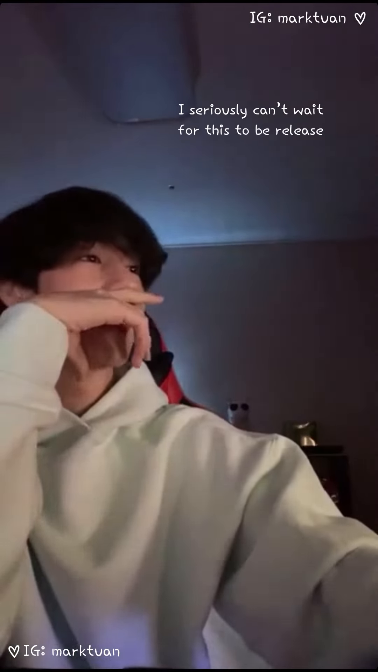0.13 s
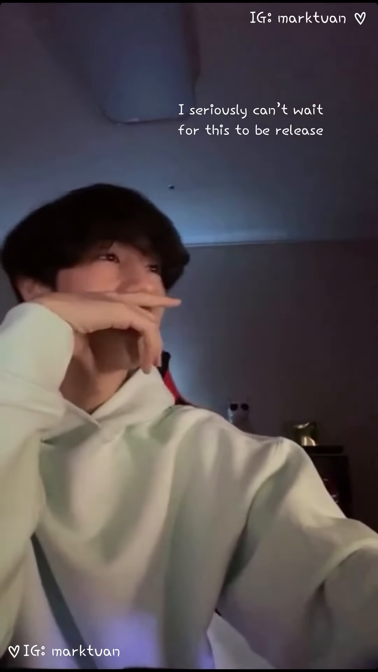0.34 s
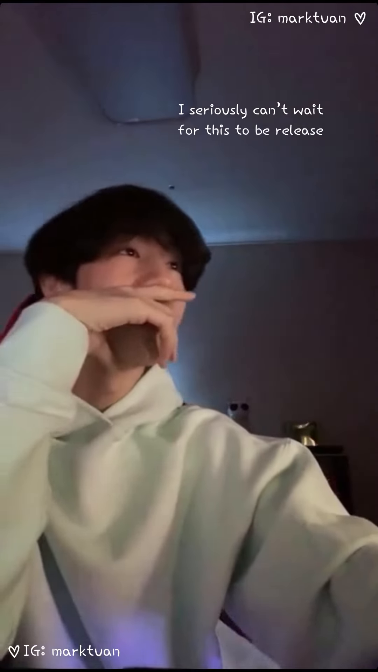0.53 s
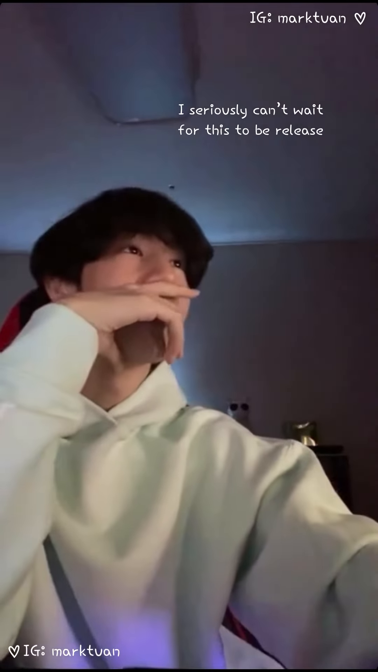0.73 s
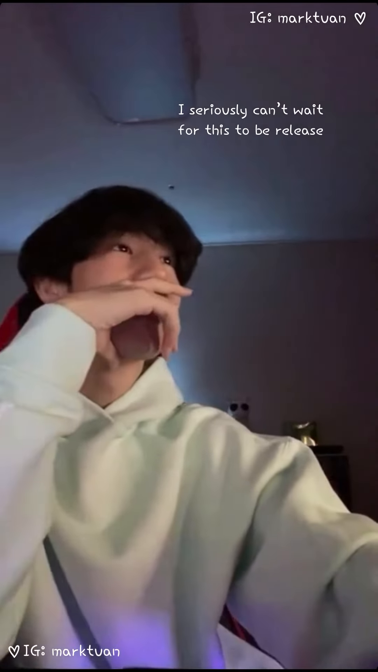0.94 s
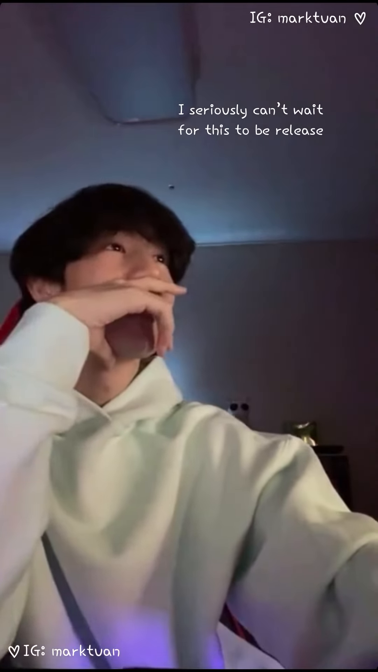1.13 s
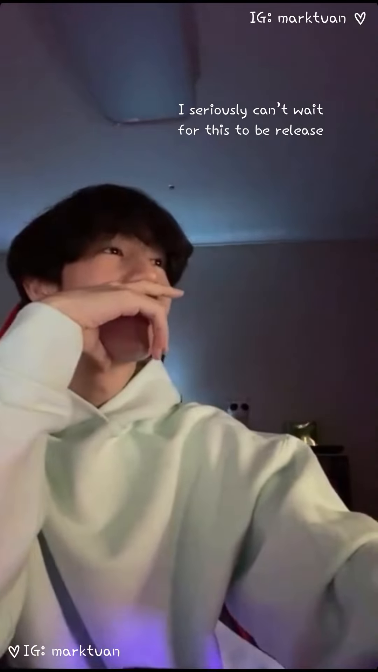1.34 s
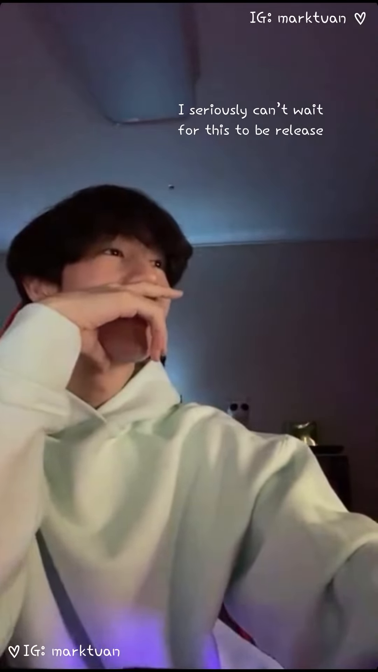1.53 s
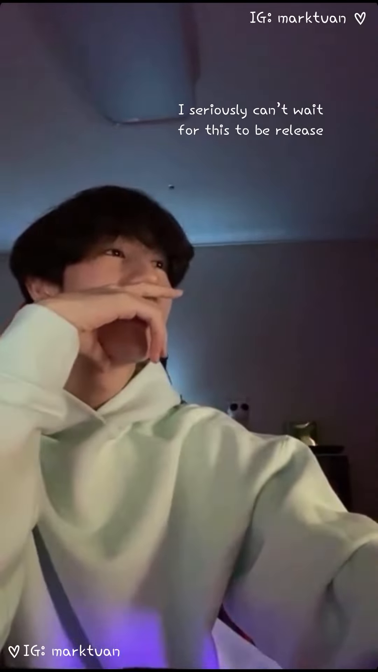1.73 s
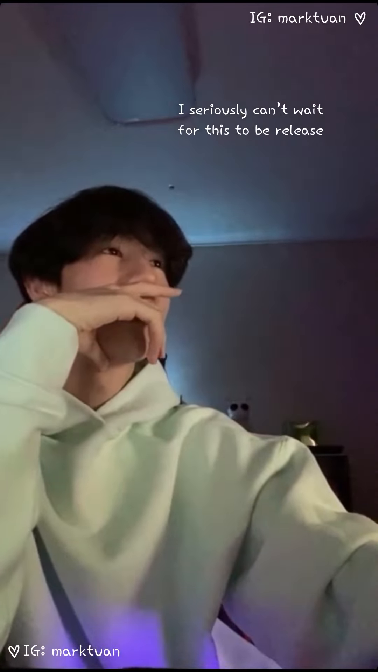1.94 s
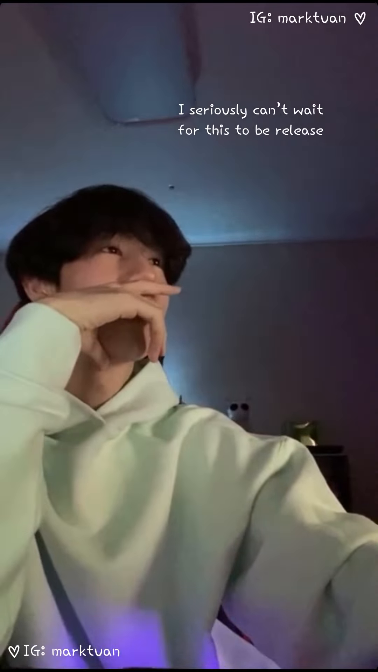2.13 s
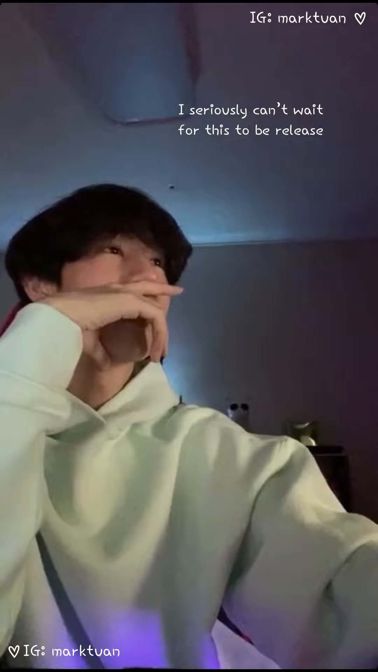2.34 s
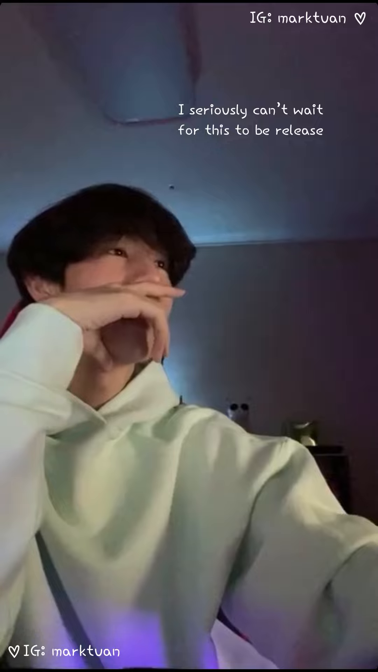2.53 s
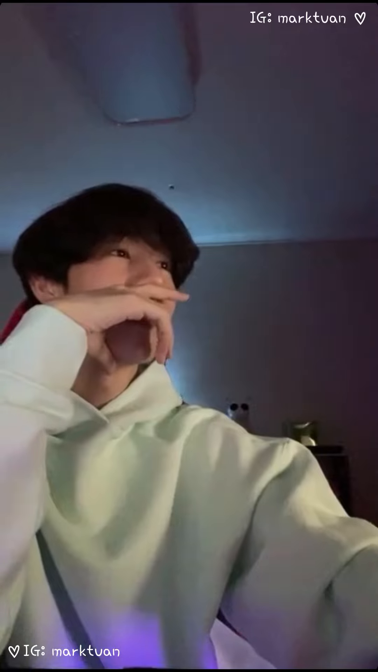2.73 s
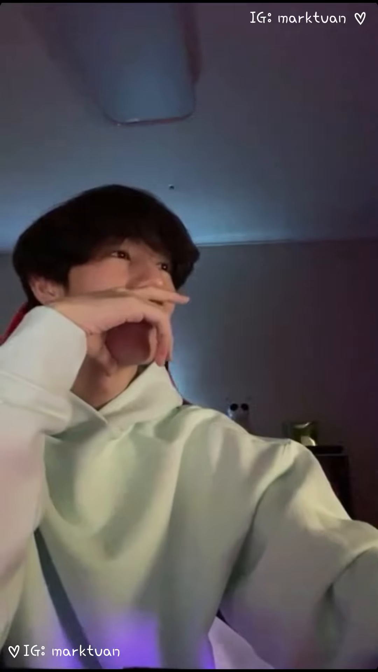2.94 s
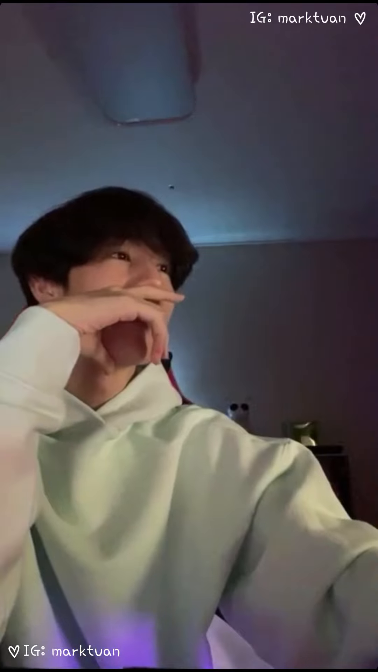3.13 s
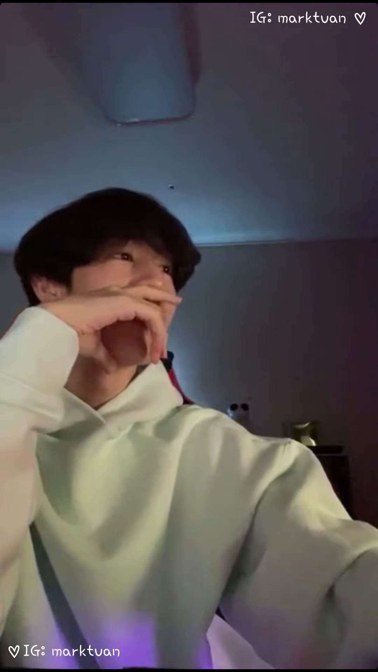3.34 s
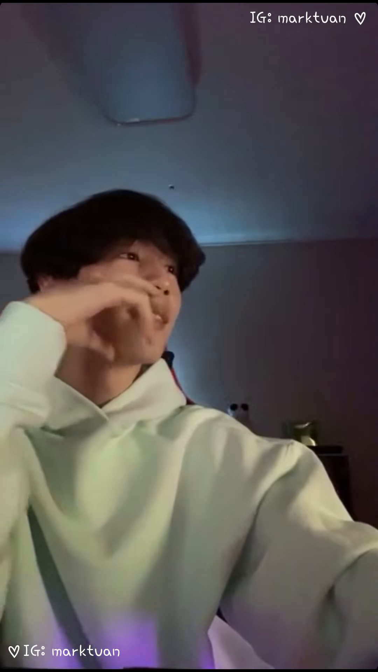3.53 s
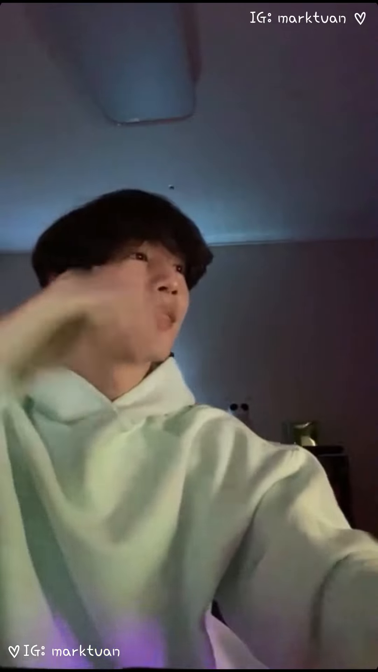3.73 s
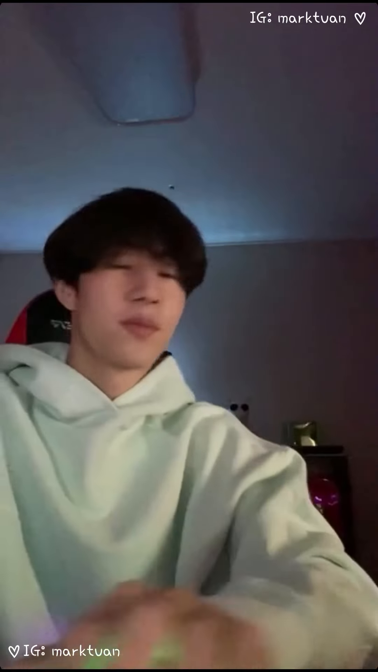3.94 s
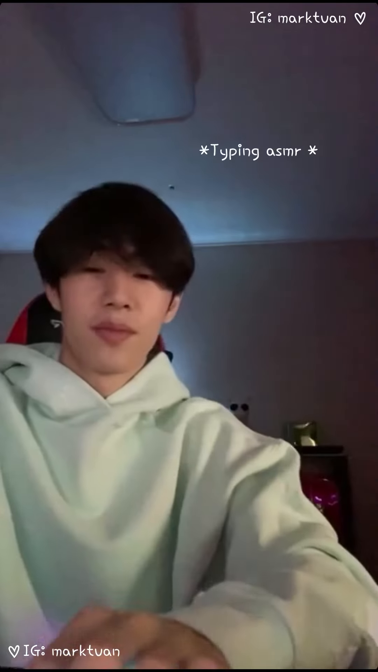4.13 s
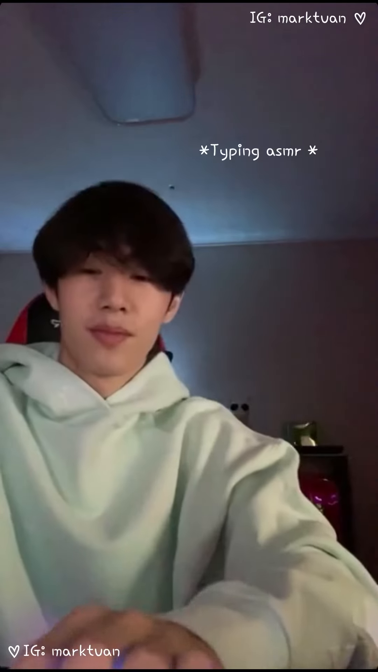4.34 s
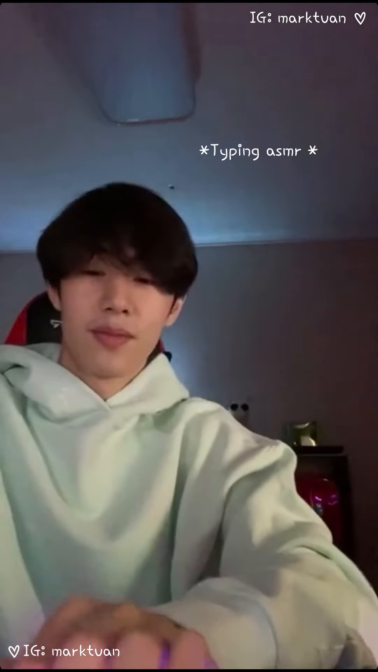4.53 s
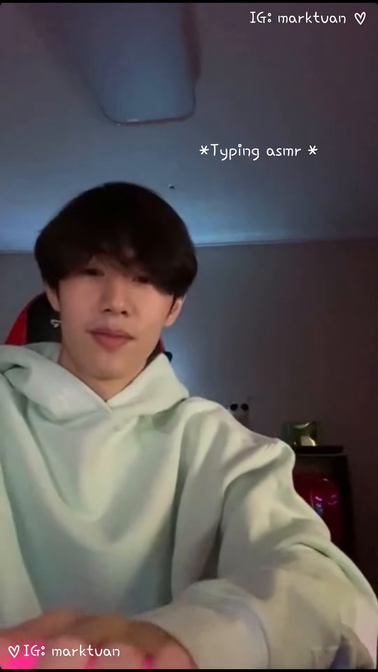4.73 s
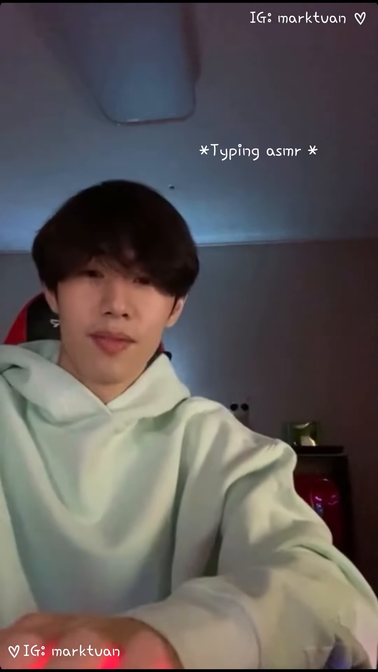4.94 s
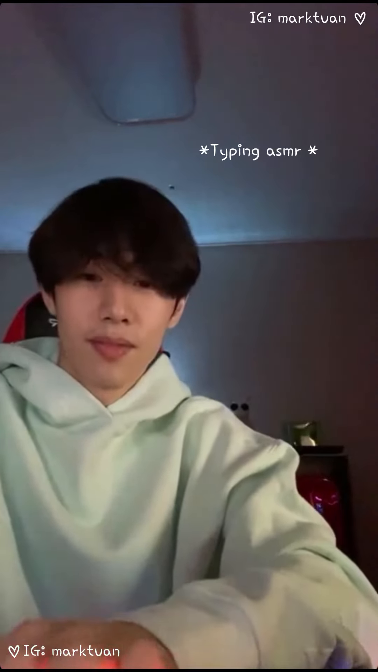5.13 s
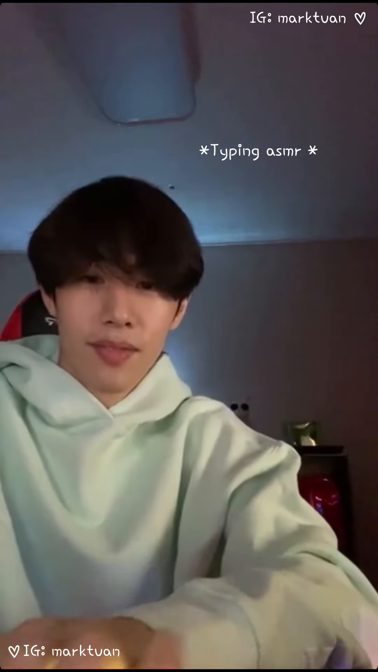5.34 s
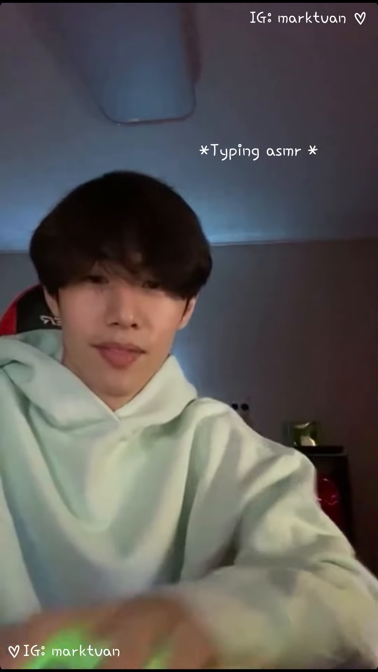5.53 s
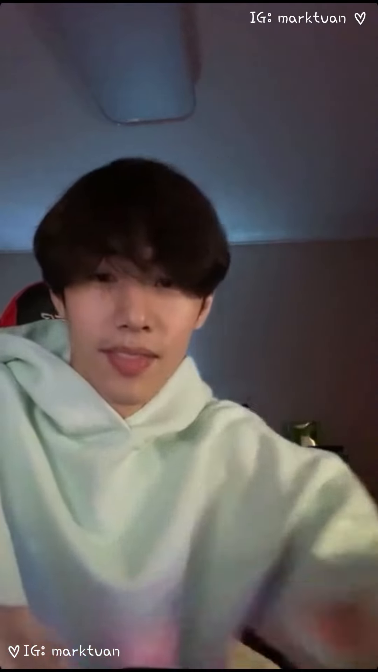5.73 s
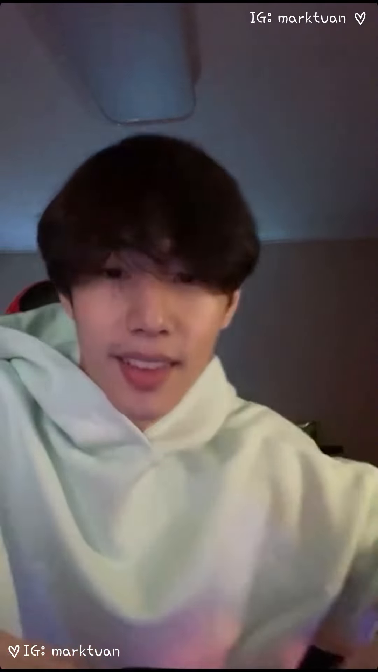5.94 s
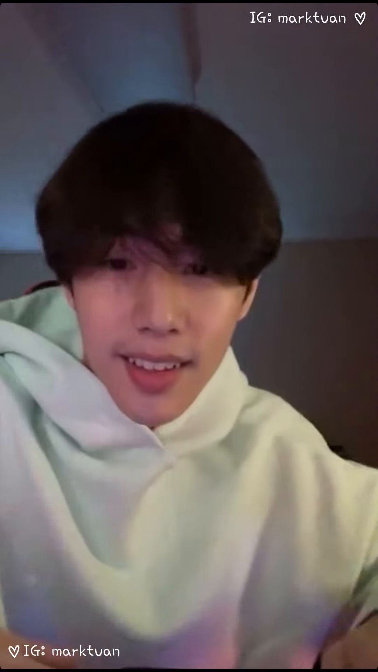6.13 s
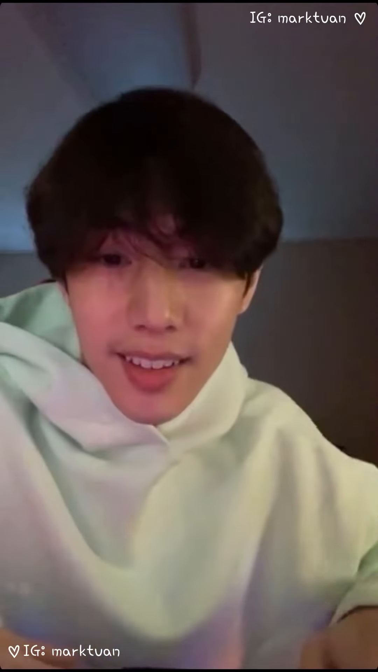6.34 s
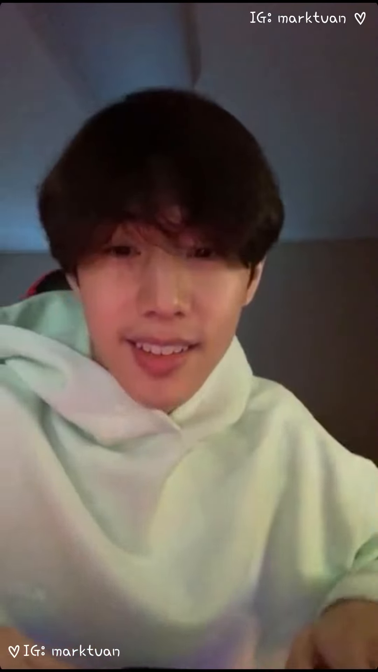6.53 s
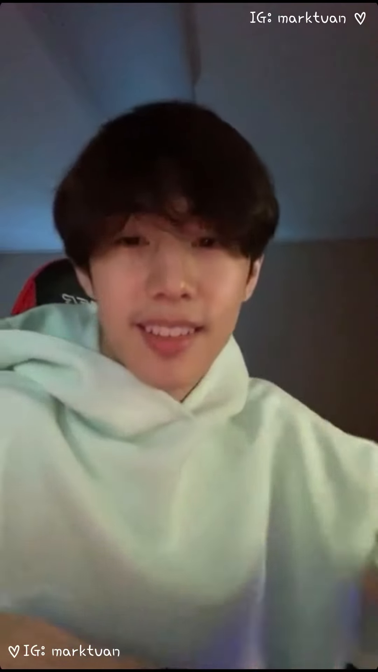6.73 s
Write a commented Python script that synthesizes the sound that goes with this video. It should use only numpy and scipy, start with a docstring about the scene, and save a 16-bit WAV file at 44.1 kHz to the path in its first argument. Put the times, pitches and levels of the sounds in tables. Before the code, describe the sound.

In a quiet small room, a computer fan hums low and faint. A mouse button clicks crisply at about one second and again at three. Clothing rustles, then a hand drops onto a plastic mechanical keyboard and types a fast, uneven burst for about a second, with clacks and dull desk thumps. Sleeve rubbing and a soft arm bump follow. Close microphone, slightly dull on top, short room tail.

```python
"""Mouse clicks and fast typing at a desk

A quiet room, heard from close by: mouse clicks, then a fast burst on a plastic mechanical keyboard.
Clicks and keys are damped modes struck by short noise contacts, each with a diffuse room tail.
Sleeves and mouse rub the desk as shaped noise, with a thin whistle on one sweep; arms bump the desk as
low decaying sines. A computer fan hums as low noise plus wavering tones.
"""
import sys
import numpy as np
from scipy import signal
from scipy.fft import rfft, irfft, next_fast_len
from scipy.io import wavfile
from scipy.ndimage import uniform_filter1d, map_coordinates

SR = 44100
rng = np.random.default_rng(int(sys.argv[2]) if len(sys.argv) > 2 else 0)


def to_wav(sig):
    """Store sig (one row per channel, or 1-D mono) as 16-bit WAV at the path in sys.argv[1].

    Samples outside -1..1 are clipped; the rate is SR.
    """
    pcm = np.clip(np.atleast_2d(sig), -1, 1) * 32767
    pcm = np.round(pcm).astype(np.int16)
    wavfile.write(sys.argv[1], SR, pcm.T)  # frames by channels


N = 298998
TIME = np.arange(N) / SR
LEAD = SR // 80  # samples of sliding before a contact


def amp(db):
    """Gain of a level in dB."""
    return 10 ** (np.asarray(db) / 20)


def unit(x):
    """x at rms 1."""
    return x / np.sqrt(np.mean(x ** 2) + 1e-20)


def along(points, hz):
    """Interpolates (Hz, value) points on a log frequency axis."""
    point_hz, values = np.transpose(points)
    return np.interp(np.log(hz + 1), np.log(point_hz + 1), values)


def curves(rows):
    """One value per sample for each column after the time."""
    s, *columns = np.transpose(rows)
    return [np.interp(TIME, s, column) for column in columns]


def filtered(x, response):
    """x times a zero-phase response of frequency."""
    m = next_fast_len(N + SR // 2)
    spectrum = rfft(x, m) * response(np.fft.rfftfreq(m, 1 / SR))
    return irfft(spectrum, m)[..., :N]


def rush(spectrum, patchy_db):
    """Noise of rms 1 with time-frequency patches of random gain."""
    z = signal.stft(rng.standard_normal(N), nperseg=512)[2]
    field = uniform_filter1d(rng.standard_normal(z.shape), size=8, axis=0)
    field = uniform_filter1d(field, size=8, axis=1)
    x = signal.istft(z * amp(patchy_db * unit(field)), nperseg=512)[1][:N]
    return unit(filtered(x, lambda hz: amp(along(spectrum, hz))))


def ring(modes, scatter_db, detune, length_s=.1):
    """One blow on an object, peak 1: every mode at a new strength and slightly new pitch."""
    t = np.arange(int(SR * length_s)) / SR
    draws = rng.standard_normal((len(modes), 2))
    x = np.zeros(len(t))
    for (hz, db, t60_s), (strength, pitch) in zip(modes, draws):
        decay = amp(db + scatter_db * strength - 60 * t / t60_s)
        x += decay * np.sin(2 * np.pi * hz * (1 + detune * pitch) * t)
    return x / np.abs(x).max()


def contact(x, decay_ms, low_hz, slide_db):
    """A faint slide, then a quick chatter of tiny impacts; a small object radiates no bass; peak kept."""
    t = np.arange(SR // 30) / SR
    blow = (1 - np.exp(-t / 0.00013)) * np.exp(-t / (max(decay_ms, .05) / 1000))
    shape = np.r_[amp(slide_db) * np.linspace(0, 1, LEAD), blow]
    force = shape * rng.standard_normal(len(shape))
    struck = signal.fftconvolve(x, force)[:len(x)]
    y = signal.sosfilt(signal.butter(4, low_hz, "high", fs=SR, output="sos"), struck)
    return y * np.abs(x).max() / np.abs(y).max()


def add(track, s, x):
    """Mixes x into the track so that its contact, LEAD samples in, falls at s seconds."""
    part = track[round(s * SR) - LEAD:][:len(x)]
    part += x[:len(part)]


def room(x):
    """A fresh diffuse tail, 5 ms late; each frequency dies at its own speed."""
    # Decay of the room. Each row: frequency in Hz, t60 in s.
    room_t60 = [(200, 0.29), (1500, 0.35), (4000, 0.22), (9000, 0.35)]
    hz, t, z = signal.stft(rng.standard_normal(SR // 4), SR, nperseg=256)
    decay = amp(-60 * t / along(room_t60, hz)[:, None])
    tail = signal.istft(z * decay, SR, nperseg=256)[1]
    return signal.fftconvolve(np.pad(x, (SR // 200, 0)), tail / np.linalg.norm(tail))


def arch(s, length_s):
    """Speed of a sweep, 0-1: swells and sinks as a sine arch to a power."""
    phase = np.clip((TIME - s) / length_s, 0, 1)
    return np.abs(np.sin(np.pi * phase)) ** 0.76


def fan():
    """Low air noise with hum lines that waver in pitch and a little in level."""
    # Fan air colour. Each row: frequency in Hz, relative level in dB per Hz.
    air_spectrum = [(12, -66), (20, -45), (36, -12), (80, -5), (206, -3), (251, -3.5), (335, -11.5),
                    (401, -6.5), (431, -8), (464, -4.5), (526, -14.5), (677, -11.5), (1500, -25),
                    (1950, -70.5), (3300, -120)]
    # Fan air level. Each row: time in s, rms in dB.
    air_level = [(0, -54.5), (3, -54.5), (4.5, -50.5), (6.78, -49)]
    # Hum lines. Each row: frequency in Hz, width of the wander in Hz, mean rms level in dB.
    hum_lines = [(86.6, 1, -64.5), (155, 6.5, -72), (180.5, 3.3, -68), (254.3, 5.8, -59),
                 (302, 6.17, -67.5), (457, 9, -73.5)]
    out = amp(curves(air_level)[0]) * rush(air_spectrum, patchy_db=1.43)
    for hz, width_hz, db in hum_lines:
        knots = rng.standard_normal((2, N // 3000))  # read at 12 per second
        drift, swell = (map_coordinates(k, [TIME * 12]) for k in knots)
        phase = 2 * np.pi * np.cumsum(hz + width_hz * drift) / SR
        out += np.sqrt(2) * amp(db + 2.04 * swell) * np.sin(phase)
    return out


def cloth():
    """Rubbing fabric: a fine hiss and a duller body, both following the speed of each sweep."""
    # Sleeve or mouse over the desk. Each row: start in s, length in s, hiss in dB, body in dB at top speed.
    sweeps = [(0.019, 0.45, -58.5, -61.5), (0.317, 0.71, -66.5, -61.5), (1.123, 0.48, -62, -64.5),
              (2.202, 0.55, -66, -69.5), (2.86, 0.32, -67.5, -65.5), (3.211, 0.59, -49.5, -48),
              (4.19, 0.76, -50.5, -53), (5.206, 0.65, -45, -49), (5.817, 0.5, -47.5, -48),
              (6.117, 0.68, -50.5, -49.5)]
    # Colour of the hiss. Each row: frequency in Hz, relative level in dB per Hz.
    hiss_spectrum = [(1180, -51), (2000, -9.5), (2720, -14.5), (3840, -9.5), (5060, -7), (7370, -8),
                     (8180, -11.5), (8700, -14.5), (11300, -51), (19100, -120)]
    # Colour of the body. Each row: frequency in Hz, relative level in dB per Hz.
    body_spectrum = [(240, -17), (400, -7), (1050, -6), (1500, -7), (2040, -7), (3000, -11.5), (3900, -14),
                     (6600, -120)]
    rest_hiss_db, rest_body_db = -71.5, -67  # cloth never lies quite still
    body_growth = 1.13  # body follows speed more steeply than hiss
    hiss_power, body_power = amp(rest_hiss_db) ** 2, amp(rest_body_db) ** 2
    for s, length_s, hiss_db, body_db in sweeps:
        speed = arch(s, length_s)
        hiss_power = hiss_power + (amp(hiss_db) * speed) ** 2
        body_power = body_power + (amp(body_db) * speed ** body_growth) ** 2
    hiss = np.sqrt(hiss_power) * rush(hiss_spectrum, patchy_db=2.04)
    body = np.sqrt(body_power) * rush(body_spectrum, patchy_db=2.5)
    return hiss + body


def whistle():
    """Sliding contact on one sweep: thin noise in two narrow bands."""
    # Colour of the whistle. Each row: frequency in Hz, relative level in dB per Hz.
    whistle_spectrum = [(1600, -37), (1850, -2), (2050, -21), (2300, -1), (2650, -40)]
    start_s, length_s, level_db = 0.33, 0.56, -65
    return amp(level_db) * arch(start_s, length_s) * rush(whistle_spectrum, patchy_db=0.5)


def arms():
    """Soft flesh excites only the desk's low boom, with a slow rise; cloth puffs where it lands."""
    # Palms and forearm bump the desk top. Each row: time in s, level before rise and decay in dB, boom in Hz.
    bumps = [(4.114, -39, 70.3), (4.444, -25.5, 84.4), (4.574, -32, 149), (4.7, -29.5, 157),
             (5.272, -26, 154), (5.667, -21.5, 100.5), (5.693, -27, 42.4), (6.663, -33, 147)]
    # Sleeve lands on the edge. Each row: time in s, level in dB, half length in s.
    scuffs = [(5.67, -33.5, 0.0086), (5.699, -39, 0.04), (6.376, -43.5, 0.024)]
    puff_spectrum = [(100, -27.0), (300, 2), (1200, -9.5), (2300, -2.0), (4000, -11.5), (8600, -14.5)]
    out, t = np.zeros(N), np.arange(SR // 3) / SR
    for s, db, hz in bumps:
        envelope = amp(db - 60 * t / .14) * (1 - np.exp(-t / 0.0089))
        boom = envelope * np.sin(2 * np.pi * hz * t)
        add(out, s, np.pad(boom, (LEAD, 0)))
    puff = sum(amp(db) * np.exp(-np.abs((TIME - s) / half_s) ** 1.4) for s, db, half_s in scuffs)
    return out + puff * rush(puff_spectrum, patchy_db=1.5)


def mouse():
    """The switch snaps, its steel spring pings and the shell knocks."""
    # Mouse button pressed and released, plus two faint knocks at 0.985 and 3.238 s. Each row: time in s,
    # level in dB, shell knock in dB and spring ring in dB relative to the snap, spring in Hz.
    clicks = [(0.985, -51.5, 7, 1, 6400), (1.0892, -23, -40, -19.5, 8240),
              (1.1592, -20, -22.5, -15.5, 8000), (3.046, -25.5, -36, -13, 7000),
              (3.1158, -28.5, -15.5, 9.5, 6970), (3.238, -50, -7, -8, 6780)]
    # Modes of the switch. Each row: frequency in Hz, relative level in dB, t60 in s.
    switch_modes = [(3960, -12, 0.026), (4700, -4, 0.029), (5570, 3, 0.027), (5880, -19, 0.024),
                    (6900, 18, 0.011), (8040, 25.5, 0.0085)]
    # Modes of the mouse shell. Each row: frequency in Hz, relative level in dB, t60 in s.
    shell_modes = [(1320, 4, 0.044), (2290, -3, 0.0122), (2720, -15, 0.011)]
    shell_lag_s = .005  # the shell knocks just after the snap
    room_db = -16
    out = np.zeros(N)
    for s, db, shell_db, spring_db, spring_hz in clicks:
        spring = ring([(spring_hz, 0, .012)], scatter_db=0, detune=0)
        snap = ring(switch_modes, scatter_db=2, detune=.01)
        shell = ring(shell_modes, scatter_db=2, detune=.02)
        shell = np.pad(shell, (round(shell_lag_s * SR), 0))[:len(shell)]
        parts = snap + amp(spring_db) * spring + amp(shell_db) * shell
        click = amp(db) * contact(parts, decay_ms=2.27, low_hz=927, slide_db=-48.5)
        add(out, s, click)
        add(out, s, amp(room_db) * room(click))
    return out


def keyboard():
    """Each contact rings plate, case, key cap and desk in its own mix, and keeps the desk top swaying."""
    # Keys bottoming out, springing back or jolted. Each row: time in s, level in dB, case knock in dB and
    # cap tick in dB relative to the plate, contact decay in ms, rebound level in dB.
    keys = [(3.9492, -46, -10, -3.5, 3.9, -66), (3.995, -37, -4, -12, 0.97, -72),
            (4.029, -51, 4, -24, 2.4, -78), (4.0886, -34.5, -26, -9, 2, -67),
            (4.1083, -27.5, -14, -20.5, 0.51, -63), (4.115, -15.5, -33.5, 5, 1.2, -30),
            (4.1879, -13.5, -19, -7, 0.45, -51), (4.2491, -14.5, -28, -6, 0.44, -71.5),
            (4.2517, -22.5, -21, 9, 2.8, -26), (4.334, -34.5, -5.5, -7, 8.2, -64),
            (4.364, -16.5, -6.5, -4.5, 2, -22.5), (4.4226, -21, -23, 0, 3, -75.5),
            (4.4376, -29.5, -6, -13.5, 2.9, -75.5), (4.4457, -3.5, -30, -0.5, 1.8, -18.5),
            (4.527, -30.5, -10.5, -6, 6.2, -28.5), (4.5734, -4.5, -2.5, -6.5, 2.4, -19),
            (4.6785, -24.5, 2.5, -8, 2.4, -68.5), (4.7054, -10.5, -14.5, -0.5, 3.45, -38.5),
            (4.8049, -9, -5, -5.5, 2.2, -34.5), (4.8385, -24, -7.5, -2.5, 4, -70),
            (4.8834, -15.5, -2.5, -6.5, 4.1, -27), (4.923, -12, -7.5, -3.5, 2.5, -48),
            (4.9668, -3, -6, -4.5, 0.7, -34), (5.0305, -20, -9, -8, 2.7, -72),
            (5.0494, -13, -10, -3, 4.5, -45), (5.0901, -6.5, -12.5, -9.5, 3, -37),
            (5.1715, -28, -30.5, 12.5, 11, -81), (5.1814, -13.5, -0.5, 10.5, 2.3, -16.5),
            (5.219, -26, -12.5, -14, 5.6, -73), (5.2666, -20.5, -9.5, 8, 5.7, -62),
            (5.628, -39.5, -25, 8, 0.8, -70), (5.6767, -24, -3.5, -17.5, 2.1, -65)]
    # Wide keys slam into the desk. Each row: time in s, peak in dB.
    thuds = [(4.4456, -31), (4.4655, -29), (5.1819, -26.5), (5.204, -33.5), (5.2668, -28)]
    # Modes of the plate. Each row: frequency in Hz, relative level in dB, t60 in s.
    plate_modes = [(2358, -2.5, 0.02), (2727, 7, 0.0068), (2960, -12.5, 0.011), (3403, 6.5, 0.0074),
                   (3870, 0, 0.013), (4305, 5, 0.0042)]
    # Modes of the case. Each row: frequency in Hz, relative level in dB, t60 in s.
    case_modes = [(1406, 0, 0.074), (1762, 15, 0.01), (2100, 5.5, 0.02)]
    # Modes of a key cap. Each row: frequency in Hz, relative level in dB, t60 in s.
    cap_modes = [(4600, 2, 0.0048), (5240, 8.5, 0.0044), (6130, 7, 0.005), (6860, 2, 0.0066),
                 (7480, 6, 0.0045), (8400, -9.5, 0.0042)]
    # Modes of the desk top. Each row: frequency in Hz, relative level in dB, t60 in s.
    desk_modes = [(334, 4.5, 0.042), (517, 0.5, 0.026), (690, -2.5, 0.037), (900, -27, .03)]
    silent_db = -55  # rebounds at or below this are skipped
    # the stem's second contact 22 ms later, usually softer: case dB, cap dB, decay ms
    rebound_s, rebound_mix = .022, (-9, -6, 1.7)
    thump_db, thump_growth = -33.5, 0.51  # desk thump of a 0 dB stroke, dB of thump per dB of stroke
    room_db = -8.5
    strokes = [row[:-1] for row in keys]
    strokes += [(s + rebound_s, db, *rebound_mix) for s, *_, db in keys if db > silent_db]
    out, pushes = np.zeros(N), np.zeros(N)
    for s, db, case_db, cap_db, decay_ms in strokes:
        parts = (plate_modes, case_modes, cap_modes, desk_modes)
        plate, case, cap, desk = (ring(part, scatter_db=3, detune=.03) for part in parts)
        plastic = plate + amp(case_db) * case + amp(cap_db) * cap
        stroke = amp(db) * contact(plastic, decay_ms, low_hz=1245, slide_db=-29.5)
        thump_gain = amp(thump_db + thump_growth * db)
        thump = thump_gain * contact(desk, decay_ms=22.0, low_hz=226, slide_db=-27.5)
        add(out, s, stroke + thump)
        # the walls hear the key from many sides at once, so the tail keeps an even colour
        to_walls = contact(plastic, decay_ms=0.18, low_hz=1040, slide_db=-42.0)
        add(out, s, amp(db + room_db) * room(to_walls))
        pushes[round(s * SR)] = amp(db)
    for s, db in thuds:
        desk = ring(desk_modes, scatter_db=3, detune=.03)
        add(out, s, amp(db) * contact(desk, decay_ms=6.6, low_hz=222, slide_db=-13))
    t = np.arange(SR // 2) / SR
    sway_envelope = amp(-32.5 - 60 * t / 0.55) * (1 - np.exp(-t / 0.012))
    sway = sway_envelope * np.sin(2 * np.pi * 69 * t)
    return out + signal.fftconvolve(pushes, sway)[:N]


def scene():
    """All sources at the single microphone."""
    return (fan() + cloth() + whistle() + arms() + mouse() + keyboard())[None]


def record(dry):
    """The loudest blows are rounded off; little is kept above the band limit but a steep skirt."""
    top_hz = 8650
    rounded = dry / (1 + np.abs(dry / .9) ** 5) ** (1 / 5)

    def response(hz):
        """Droop below the band limit, skirt of -10 dB per kHz above it."""
        droop = amp(-6 * np.clip((hz - 7800) / 900, 0, 2) ** 2)
        skirt = amp(-28.5 - 0.01 * np.abs(hz - top_hz))
        return np.where(hz < top_hz, droop, skirt)

    return filtered(rounded, response)


dry = scene()
out = record(dry)
to_wav(out)
```